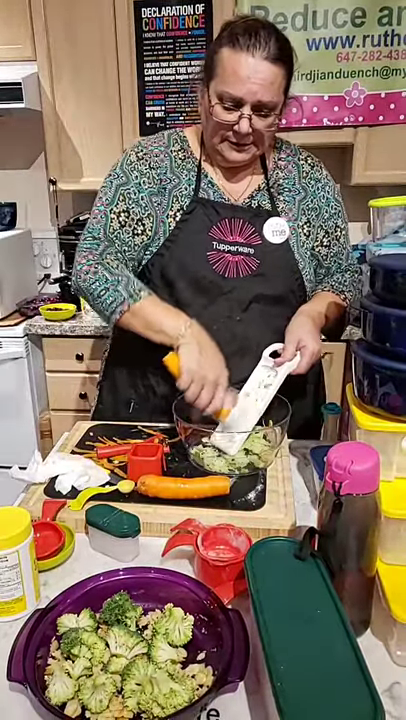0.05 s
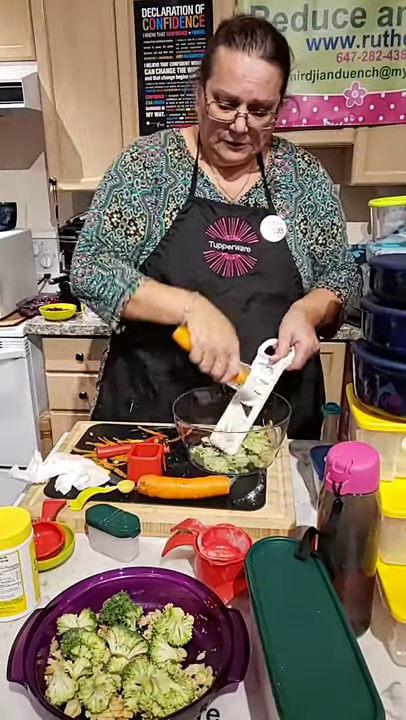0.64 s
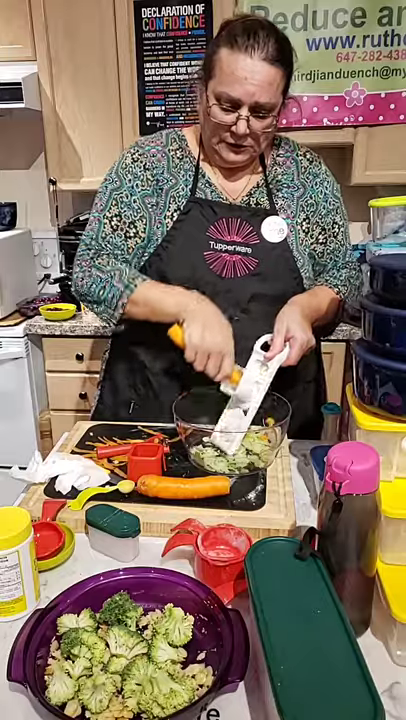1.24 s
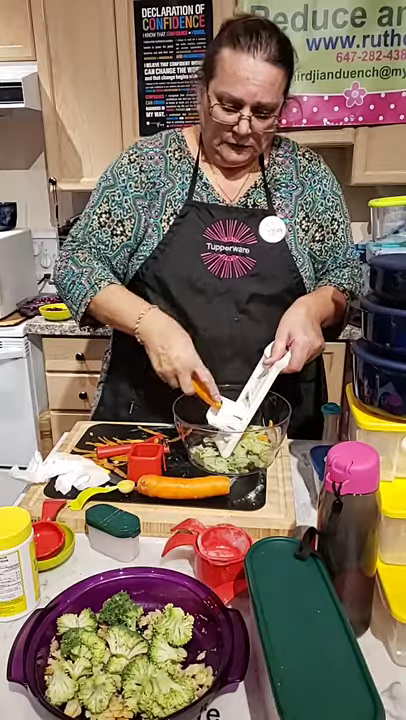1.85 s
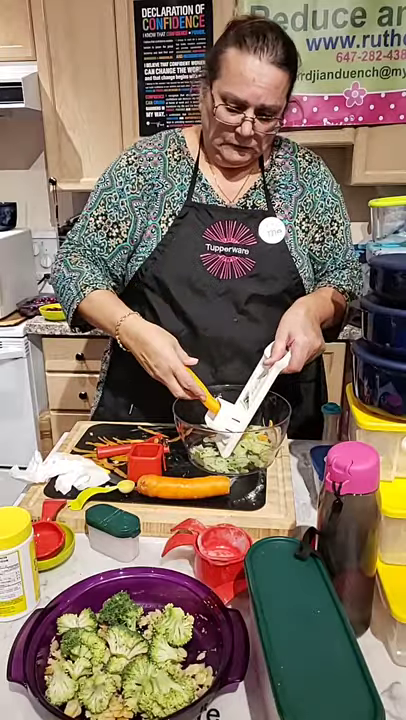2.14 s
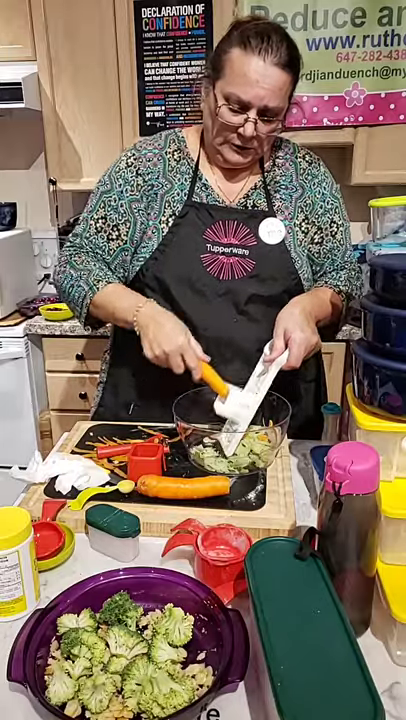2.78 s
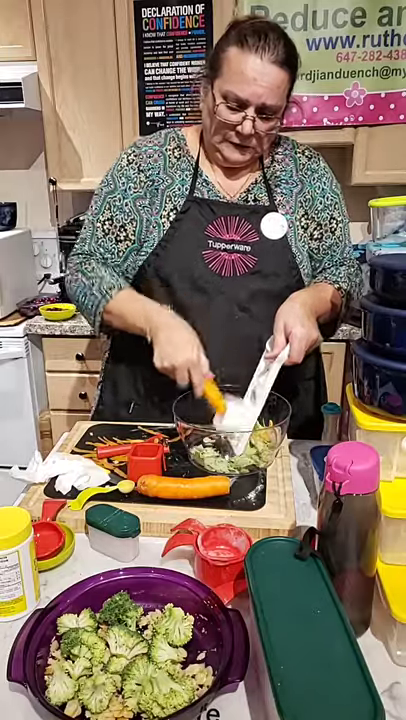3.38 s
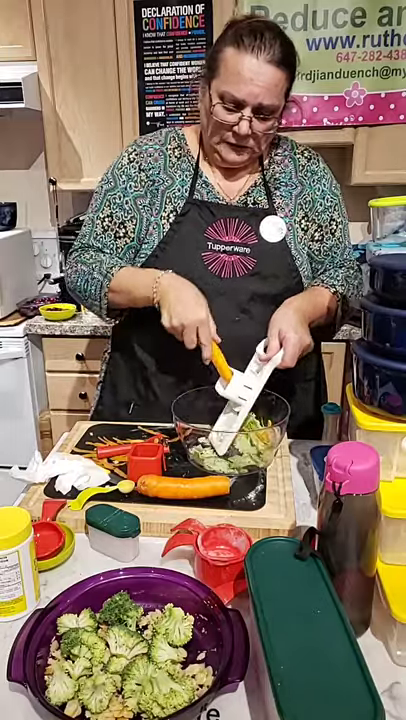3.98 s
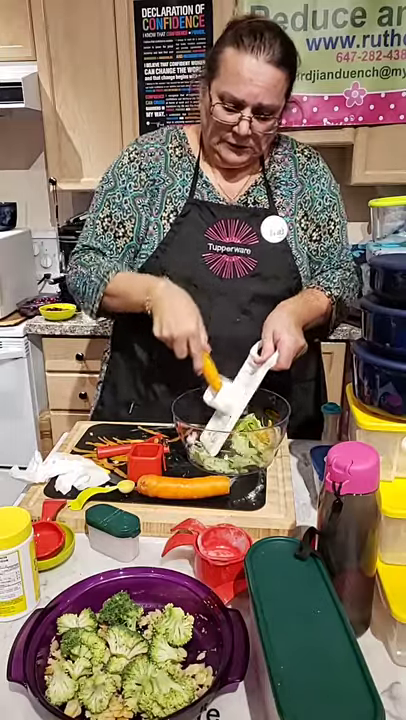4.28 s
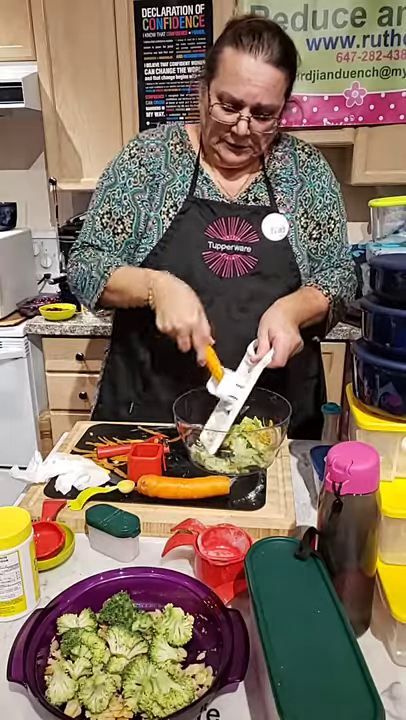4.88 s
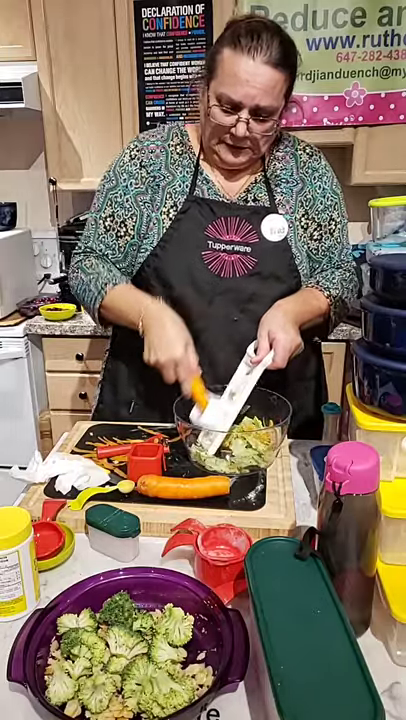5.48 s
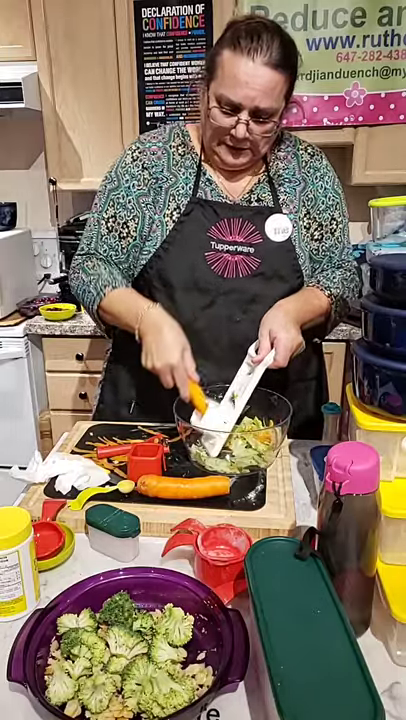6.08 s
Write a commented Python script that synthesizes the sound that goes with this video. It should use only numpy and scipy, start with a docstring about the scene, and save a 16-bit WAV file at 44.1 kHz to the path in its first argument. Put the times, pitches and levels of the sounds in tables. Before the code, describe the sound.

From the start, a carrot is pushed over a plastic hand slicer resting in a bowl. Short, rough scrapes end in crisp snaps at the blade, each with a hollow bump from the bowl, while small ticks and plastic knocks fall between the uneven strokes. At about 1.5 seconds the cutting pauses, leaving a faint rub and a few light knocks. Slicing resumes near 2.9 seconds with several separate cuts, the strongest just after 3 seconds. From about 4.3 seconds the strokes turn quick and even, roughly four a second, lighter at first and then firmer until the end at around 6 seconds. One microphone hears it all directly, with short reflections off the worktop and cupboards of a small kitchen. A faint, low appliance hum continues underneath.

```python
"""Slicing a carrot in a small kitchen

A carrot is pushed to and fro over a plastic hand slicer that rests in a bowl. Each stroke scrapes
along the plate and ends in a crisp snap at the blade, which jolts the bowl; the frame knocks between
strokes. After a short pause the strokes turn quick and even. One microphone hears it all directly,
with a wash off the nearby worktop and cupboards; an appliance hums underneath."""
import sys
import numpy as np
from scipy import signal
from scipy.fft import rfft, irfft, next_fast_len
from scipy.io import wavfile
from scipy.ndimage import uniform_filter1d, map_coordinates

SR = 44100
rng = np.random.default_rng(int(sys.argv[2]) if len(sys.argv) > 2 else 0)


def wav_record(signal):
    """Record a signal, one row per channel, as 16-bit PCM in the file named by sys.argv[1]."""
    frames = np.transpose(np.atleast_2d(signal))
    bounded = np.clip(frames, -1, 1)
    # unit amplitude maps onto the largest positive 16-bit level
    quanta = np.round(bounded * 32767).astype(np.int16)
    wavfile.write(sys.argv[1], SR, quanta)


N = 270333

# decay of the kitchen: (frequency [Hz], t60 [s])
KITCHEN_DECAY = [(150, 0.38), (500, 0.19), (1500, 0.22), (4500, 0.26), (8000, 0.22), (13000, 0.31)]
# hum of the appliance at the microphone: (frequency [Hz], rms level [dB])
HUM_PARTIALS = [(121, -63), (145, -64.5), (242, -65), (290, -65.5)]
# broad colour of each sound: (frequency [Hz], relative level [dB])
AIR_COLOUR = [(25, -19), (48, 1), (100, -10), (147, -5), (205, -10.5), (340, -14.5), (620, -16),
              (1470, -21), (2400, -32), (6000, -38.5), (9500, -50), (14000, -44.5)]
RUB_COLOUR = [(40, -26.5), (120, -16), (400, -5.5), (750, -9.5), (1150, -2), (1450, -7.5), (2000, -10),
              (2700, -8.5), (6000, -21)]
CRUNCH_COLOUR = [(300, -29.5), (1500, -30.5), (3000, 3), (5200, 2), (7500, 5), (9500, -1), (14000, 1.5)]
SNAP_COLOUR = [(40, -18.5), (110, -7), (200, -13), (330, -11.5), (620, -10), (750, -10.5), (1050, -5.5),
               (1400, -5.5), (1750, -3), (2900, -3), (4400, -1.5), (7500, -3.5), (10000, -12.5),
               (11300, -9.5), (14000, -10.5)]
KNOCK_COLOUR = [(40, -48.5), (400, 0), (760, -4), (1150, 9.5), (1400, 3), (1900, 6), (2600, -9),
                (7500, -13.5), (9500, -21), (14000, -19)]
# resonances of slicer and bowl: (frequency [Hz], width [Hz], height over the broad colour [dB])
SLICER_MODES = [(504.5, 30, 4.5), (641, 33, 12.5), (860, 70, 7.5), (1195, 290, 3.5), (1549, 28, 10.5),
                (1682, 53, 10.5), (1807, 37, 2.5), (1880, 30, 10), (2032, 154.6, 5), (2330, 255, 2),
                (2870, 52, 3), (5330, 40, 8.5)]
# low and high ring of the plate under the carrot: (frequency [Hz], width [Hz], level re rubbing [dB])
PLATE_RINGS = [(1131, 45, -5), (1850, 120, -8)]
# low modes of the bowl: (frequency [Hz], relative level before tilt [dB], t60 [s])
BOWL_MODES = [(323, -8.5, 0.087), (402.7, -7, 0.08), (527, -5, 0.09), (627, -9.5, 0.07), (643.7, -1, 0.068)]
# slow pushes down the plate, each up to the next cut: (start [s], level at the blade [dB])
SLOW_PUSHES = [(0, -42), (0.153, -33.5), (0.445, -38.5), (.75, -45.5), (1.07, -43.5), (1.342, -46.5),
               (3.095, -37.5), (3.44, -40)]
# the carrot is drawn back or shifted: (start [s], length [s], level [dB], lean to the high ring [dB])
DRAGS = [(0.068, 0.033, -47, 0), (0.248, 0.083, -46, -13), (0.569, 0.057, -41.5, -2), (0.9, 0.033, -39, 11),
         (1.199, 0.049, -43, 12.5), (1.508, 0.081, -54.5, -5), (1.865, 0.014, -55, -10),
         (2.886, 0.032, -45.5, 9), (3.028, 0.035, -52.5, 37), (3.286, 0.028, -43, 0), (3.602, 0.02, -45, 7),
         (3.678, 0.033, -43.5, 7), (4.345, 0.075, -53, 11)]
# the blade snaps through the carrot: (time [s], crack level [dB], clack re crack [dB],
# length of the break [s], crack pitch [Hz], strongest ring of the plastic [Hz], bowl level [dB])
CUTS = [(0.0247, -36, -5, 0.0036, 4600, 1407, -56), (0.1601, -39.5, 4, 0.003, 4260, 1614, -51),
        (0.4774, -33.5, -3, 0.0034, 4520, 1730, -44.5), (0.8081, -41, 1.5, 0.0025, 4300, 1800, -47),
        (0.9736, -39.5, -0.5, 0.0026, 6000, 1660, -52.5), (1.124, -40, 2, 0.005, 4900, 1520, -50),
        (1.411, -33.5, -4, 0.0036, 4710, 1703, -45), (2.9357, -33, -0.5, 0.0031, 3610, 1815, -45.5),
        (3.1304, -31, -2, 0.0039, 4500, 1886, -40), (3.1379, -33.5, -5, 0.0061, 3500, 1570, -62),
        (3.4777, -34, -3, 0.0024, 4230, 1795, -41.5), (4.1906, -34.5, -5.5, 0.003, 4200, 1787, -45.5),
        (4.535, -40.5, -5.5, 0.0027, 4300, 1630, -49.5), (4.834, -54, -2.5, 0.0045, 3540, 1920, -70),
        (5.0743, -39, -5.5, 0.0028, 3880, 1613, -47.5), (5.3424, -49, 0, 0.0039, 4320, 1630, -55.5),
        (5.5874, -39.5, -4, 0.0055, 4460, 1600, -47.5), (5.85, -37.5, -3, 0.0026, 4130, 1600, -47.5),
        (6.1092, -35, -1.5, 0.0034, 4150, 1630, -45.5)]
# carrot and frame knock together: (time [s], crack level [dB], clack re crack [dB], strongest ring [Hz])
FRAME_KNOCKS = [(0.0902, -62, 13.5, 1720), (0.4286, -48, 2, 1126), (0.725, -51, 2, 2110),
                (0.8885, -56, 5, 1900), (1.042, -52.5, -4.5, 1880), (1.046, -47, -0.5, 1960),
                (1.8851, -72, 8.5, 1130), (2.5086, -63.5, 8, 1205), (2.7323, -54, 8, 1805),
                (2.965, -66, 6, 1780), (3.053, -48.5, 3, 1700), (3.119, -43, 0, 1850),
                (3.262, -63, 5, 1830), (3.591, -64, 7, 1950), (3.6731, -60, 2, 1920),
                (3.7965, -55, 2, 1940), (4.0477, -53, -1, 1730), (4.1663, -53, 2.5, 1940),
                (4.6828, -57, 5, 1940), (5.0049, -60.5, 5, 1880), (5.831, -52.5, 1.5, 1850),
                (6.0886, -48.5, 1, 1970)]
# the carrot snags on the edge: (time [s], crack level [dB])
SNAGS = [(0.308, -53.5), (0.3578, -54.5), (1.259, -56.5), (1.346, -58), (3.329, -60), (3.9425, -64.5),
         (4.1042, -57.5), (4.3455, -60.5), (4.3905, -62.5), (4.643, -68), (4.7105, -55.5), (4.755, -57),
         (4.916, -61.5), (4.956, -68), (5.3054, -62.5), (5.4307, -60), (5.5602, -61), (5.7745, -61),
         (5.808, -53), (5.9491, -56.5), (5.9708, -53), (5.986, -54.5), (6.0529, -57)]

BAND_EDGES_HZ = 900, 2600  # thud | clack | crack
CUT_THUD_DB, KNOCK_THUD_DB = -30, -8.5  # offsets of the frame's dull thud
QUICK_FROM_S = 4.29  # from here on the strokes are quick: push, cut, turn, drag back


def amp(db):
    """Decibels to gain."""
    return 10 ** (np.asarray(db) / 20)


def unit(x):
    """Scale to rms 1."""
    return x / np.sqrt(np.mean(x ** 2) + 1e-20)


def along(points, hz):
    """Read (frequency [Hz], value) points on a log axis."""
    knots_hz, values = np.transpose(points)
    return np.interp(np.log(hz + 1), np.log(knots_hz + 1), values)


def wobble(rate):
    """A smooth random curve, rate knots a second."""
    return map_coordinates(rng.standard_normal(int(N * rate / SR) + 4), [np.arange(N) * rate / SR])


def filtered(x, gain):
    """Causal (minimum-phase) filter with the given gain against frequency."""
    m = 2 * next_fast_len(len(x) // 2 + SR // 10)
    cepstrum = irfft(np.log(np.maximum(gain(np.fft.rfftfreq(m, 1 / SR)), 1e-6)), m)
    cepstrum[1:m // 2] *= 2
    cepstrum[m // 2 + 1:] = 0
    return irfft(rfft(x, m) * np.exp(rfft(cepstrum)), m)[:len(x)]


def add(track, s, sound):
    """Mix a sound into the track at time s."""
    start = max(round(s * SR), 0)
    track[start:start + len(sound)] += sound[:N - start]


def room_tone(air_db, waver_rad):
    """Air noise and the slightly unsteady hum of an appliance."""
    t = np.arange(N) / SR
    air = unit(filtered(rng.standard_normal(N), lambda hz: amp(along(AIR_COLOUR, hz))))
    hum = sum(amp(db) * np.sqrt(2) * np.sin(2 * np.pi * hz * t + waver_rad * wobble(9.9))
              for hz, db in HUM_PARTIALS)
    return amp(air_db) * air + hum


def kitchen_wash(arrival_s=0.0047):
    """Dense reflections off worktop and cupboards, energy 1, reaching the microphone in milliseconds."""
    hz, t, noise = signal.stft(rng.standard_normal(SR // 2), SR, nperseg=256)
    decay = amp(-60 * t / along(KITCHEN_DECAY, hz)[:, None])
    tail = signal.istft(noise * decay, SR, nperseg=256)[1][:SR // 3]
    tail *= 1 - np.exp(-(np.arange(len(tail)) / SR / arrival_s) ** 4)
    return tail / np.linalg.norm(tail)


def at_microphone(direct, wet_db):
    """The direct sound with the kitchen's wash behind it."""
    return direct + amp(wet_db) * signal.fftconvolve(direct, kitchen_wash())[:len(direct)]


def through_plastic(force, colour, modes):
    """A force heard through the slicer: a broad colour with ringing resonances on top."""
    def gain(hz):
        peaks = sum(amp(db) ** 2 / (1 + (2 * (hz - centre) / width) ** 2) for centre, width, db in modes)
        return amp(along(colour, hz)) * np.sqrt(1 + peaks)
    return filtered(force, gain)


def slide(start, end, db, swell_db_per_s=0, grip_db_per_s=680, release_db_per_s=350):
    """Gain of one slide: it grips, holds or swells to db at its end, and lets go."""
    t = np.arange(N) / SR
    held = db - swell_db_per_s * np.maximum(end - t, 0)
    return amp(held - grip_db_per_s * np.maximum(start - t, 0) - release_db_per_s * np.maximum(t - end, 0))


def strokes(stall_s=0.007, quick_push_s=0.065, turn_s=0.08, quick_drag_s=0.053):
    """Gains of rub, crunch, low and high ring as the carrot is pushed, stalls at the blade and returns."""
    def voiced(gain, crunch_db, lean_db):
        return np.outer(amp([0, crunch_db, -lean_db / 2, lean_db / 2]), gain)

    cut_times = [row[0] for row in CUTS]
    gains = np.zeros((4, N))
    for s, db in SLOW_PUSHES:
        next_cut = min(cut for cut in cut_times if cut > s)
        push = slide(s, next_cut - stall_s, db, swell_db_per_s=70.5)  # gathers speed toward the blade
        gains += voiced(push, crunch_db=-3, lean_db=1)
    for s, length, db, lean_db in DRAGS:
        gains += voiced(slide(s, s + length, db), crunch_db=-5.5, lean_db=lean_db)
    for cut in (s for s in cut_times if s > QUICK_FROM_S):
        effort_db = 8 * ((cut - QUICK_FROM_S) / 1.67) ** 3  # the hand leans in ever harder
        push = slide(cut - quick_push_s, cut - stall_s, db=-56 + effort_db / 2)
        drag = slide(cut + turn_s, cut + turn_s + quick_drag_s, db=-52.5 + effort_db)
        gains += voiced(push, crunch_db=4.5, lean_db=16.5)
        gains += voiced(drag, crunch_db=-1.5, lean_db=16.5)
    return gains


def catches(release_s=0.0035):
    """Gain of the friction: some 35 times a second the carrot catches and lets go with a soft tick."""
    gaps_s, sizes = rng.uniform([.008, 1.5], [.05, 7], (400, 2)).T
    kicks = np.bincount((np.cumsum(gaps_s) * SR).astype(int), sizes, N)[:N]
    fading = signal.lfilter([1], [1, -np.exp(-1 / (release_s * SR))], kicks)
    return unit(1 + uniform_filter1d(fading, size=30))


def slips(rate, spread_db):
    """Dense tiny slips of uneven size, about rate a second."""
    sizes = amp(spread_db * np.minimum(rng.exponential(size=N), 3)) * rng.choice([-1, 1], N)
    return unit((rng.random(N) < rate / SR) * sizes)


def plate_ring(force, hz, width, drift=0.035):
    """One narrow resonance of the plate, about as strong as its force, detuned by the moving carrot."""
    b, a = signal.iirpeak(hz, hz / width, fs=SR)
    ring = signal.hilbert(signal.lfilter(b, a, force), next_fast_len(N))[:N]
    ring *= np.sqrt(SR / (np.pi * width))
    detune_hz = drift * hz * wobble(6)
    return np.real(ring * np.exp(2j * np.pi * np.cumsum(detune_hz) / SR))


def sliding(wet_db, ring_db, judder):
    """The wet cut face judders over the plate and sets it ringing, while its cells crackle at the edge."""
    rub_gain, crunch_gain, *ring_gains = strokes()
    grip = catches() ** judder
    scuff = uniform_filter1d(grip, size=300)  # the heavy plate follows each catch more slowly
    modes = [(hz, width, db + ring_db) for hz, width, db in SLICER_MODES]
    friction = scuff * slips(rate=1600, spread_db=-2)
    rub = rub_gain * unit(through_plastic(friction, RUB_COLOUR, modes))
    for gain, (hz, width, db) in zip(ring_gains, PLATE_RINGS):
        rub += amp(db) * plate_ring(gain * scuff * slips(rate=1500, spread_db=0.5), hz, width)
    crackle = grip * slips(rate=6000, spread_db=-0.5)
    crunch = crunch_gain * unit(through_plastic(crackle, CRUNCH_COLOUR, modes))
    return at_microphone(rub, wet_db) + at_microphone(crunch, wet_db)


def struck_modes(ring_db):
    """Each point of contact wakes the resonances differently; a light touch leaves them freer to ring."""
    return [(hz, width, db + ring_db + rng.normal(0, 2.5)) for hz, width, db in SLICER_MODES]


def impact(length_s, colour, modes, band_db, wet_db, bright):
    """A burst of tiny fractures and its wash in the room; band_db sets thud, clack and crack."""
    t = np.arange(SR // 3) / SR
    age = t / max(length_s, .001)
    burst = rng.standard_normal(len(t)) * age ** .75 * np.exp(-age ** 2)
    direct = signal.lfilter([1, -bright], 1, burst)  # treble beams straight at the microphone
    with_room = direct / np.linalg.norm(burst) + amp(wet_db) * kitchen_wash()
    sound = through_plastic(with_room, colour, modes)
    band = np.searchsorted(BAND_EDGES_HZ, np.fft.rfftfreq(len(t), 1 / SR))
    band_rms = [np.std(irfft(rfft(sound) * (band == k))) for k in range(3)]
    thud, clack, crack = amp(band_db) / band_rms
    balance = [(700, thud), (1100, clack), (2200, clack), (3000, crack)]
    return filtered(sound, lambda hz: along(balance, hz))


def cuts(wet_db, ring_db, strongest_db, width_hz, crack_width_hz=300, crack_peak_db=7):
    """Slices break off at the blade, each with its own pitch, and jolt the whole frame."""
    track = np.zeros(N)
    for s, db, clack_db, length_s, crack_hz, ring_hz, _ in CUTS:
        levels = [db / 2 + CUT_THUD_DB, db + clack_db, db]
        modes = struck_modes(ring_db)
        modes += [(crack_hz, crack_width_hz, crack_peak_db), (ring_hz, width_hz, strongest_db)]
        add(track, s, impact(length_s, SNAP_COLOUR, modes, levels, wet_db, bright=0.57))
    return track


def bowl(wet_db, attack_s):
    """Each cut drives the slicer's foot into the bowl: a hollow knock at the same pitches every time."""
    track, t = np.zeros(N), np.arange(SR // 3) / SR
    for s, *_, db in CUTS:
        tilt_db_per_octave = 5.5 if s > QUICK_FROM_S else -2  # heavy slow strokes favour the lowest modes
        ring = np.zeros(len(t))
        for hz, mode_db, t60 in BOWL_MODES:
            struck_db = mode_db + tilt_db_per_octave * np.log2(hz) + rng.normal(0, 1)
            ring += amp(struck_db - 60 * t / t60) * np.sin(2 * np.pi * (hz * t + rng.random() / 2))
        ring *= 1 - np.exp(-t / attack_s)
        add(track, s, amp(db) * unit(at_microphone(ring, wet_db)))
    return track


def frame_knocks(wet_db, ring_db, strongest_db, width_hz):
    """Lighter contacts sound the plastic's hollow midrange; the spot struck picks the strongest ring."""
    track = np.zeros(N)
    for s, db, clack_db, ring_hz in FRAME_KNOCKS:
        levels = [db + clack_db / 2 + KNOCK_THUD_DB, db + clack_db, db]
        modes = struck_modes(ring_db) + [(ring_hz, width_hz, strongest_db)]
        contact_s = 0.0025 * amp(clack_db / 2)  # the duller the knock, the softer the contact
        add(track, s, impact(contact_s, KNOCK_COLOUR, modes, levels, wet_db, bright=0.58))
    return track


def snags(wet_db, clack_db, tear_s=0.0032):
    """The cut face snags on the edge and tears free with a small crisp tick."""
    track = np.zeros(N)
    for s, db in SNAGS:
        levels = [db + KNOCK_THUD_DB, db + clack_db, db]
        add(track, s, impact(tear_s, KNOCK_COLOUR, struck_modes(0), levels, wet_db, bright=0.63))
    return track


def scene():
    """Slicing over the quiet of the kitchen, in mono."""
    slicing = cuts(wet_db=-2, ring_db=-2.5, strongest_db=14, width_hz=40)
    slicing += bowl(wet_db=-7, attack_s=0.0019)
    slicing += frame_knocks(wet_db=-3, ring_db=0.5, strongest_db=17, width_hz=50)
    slicing += snags(wet_db=-4, clack_db=-1.5)
    slicing += sliding(wet_db=-5, ring_db=1, judder=0.9)
    return (slicing + room_tone(air_db=-56, waver_rad=0.6))[None]


def record(dry):
    """The microphone chain cuts off steeply above 13950 Hz."""
    return signal.sosfilt(signal.ellip(10, .2, 70, 13950, fs=SR, output="sos"), dry)


dry = scene()
out = record(dry)
wav_record(out)
```